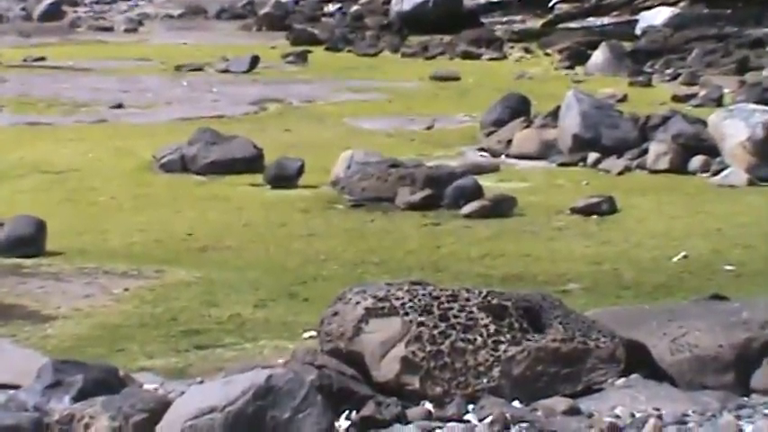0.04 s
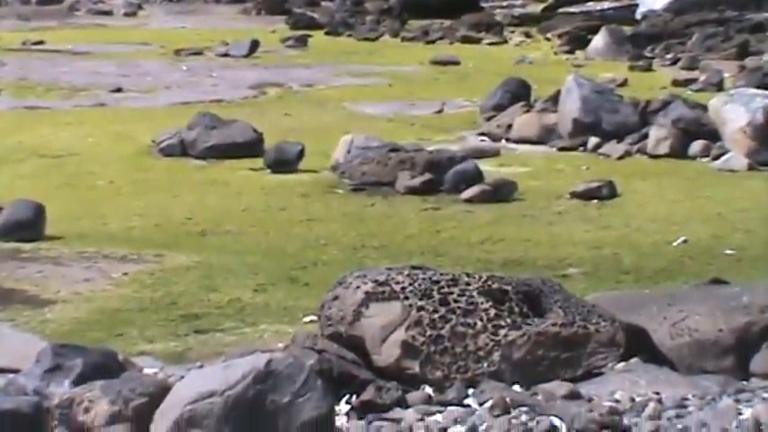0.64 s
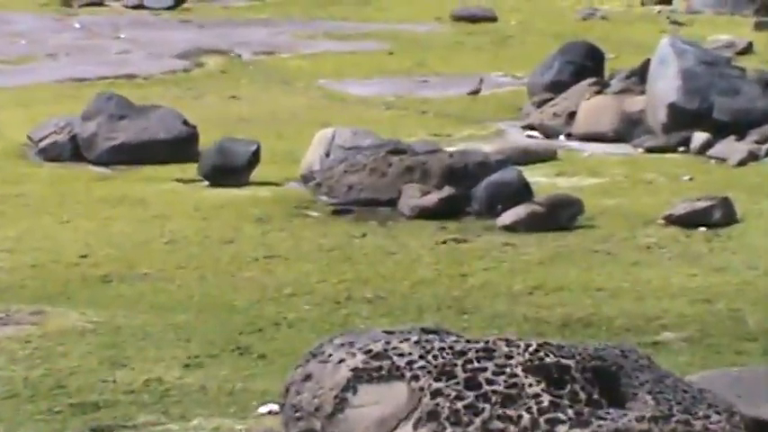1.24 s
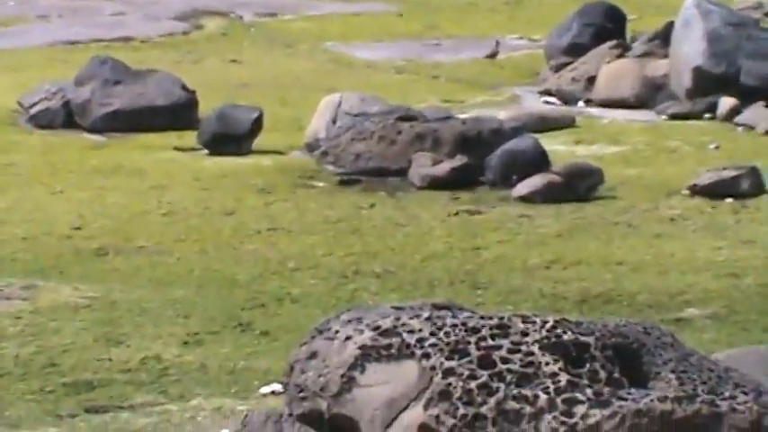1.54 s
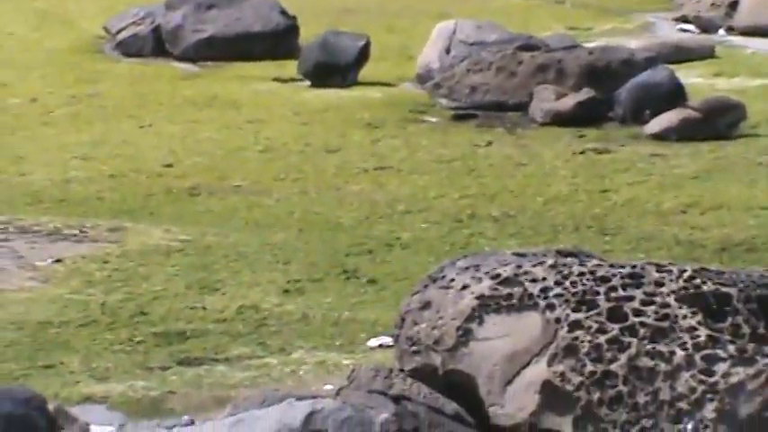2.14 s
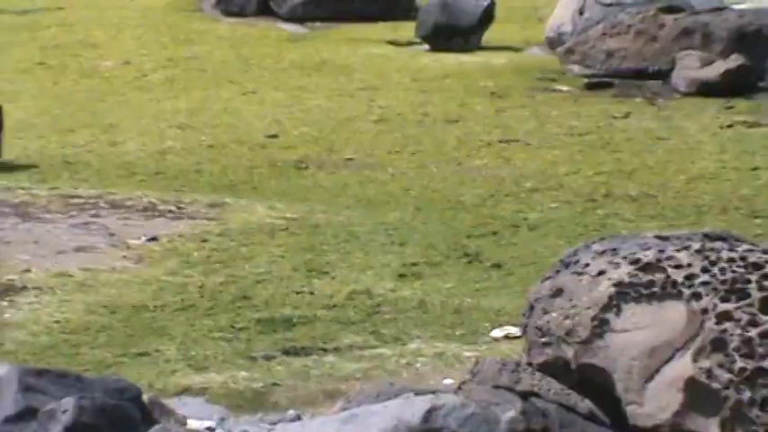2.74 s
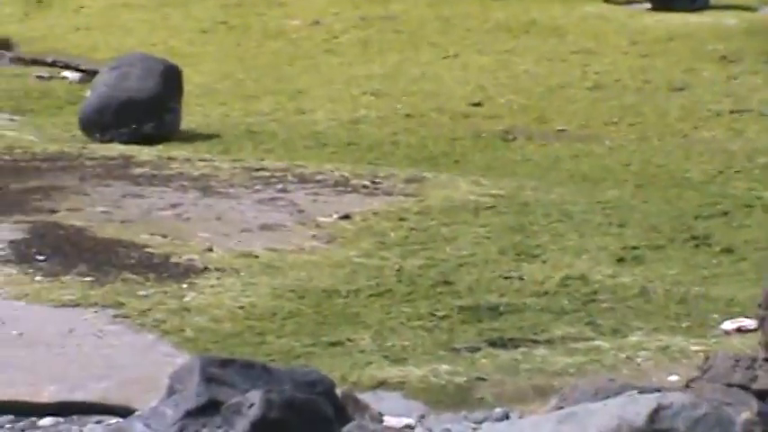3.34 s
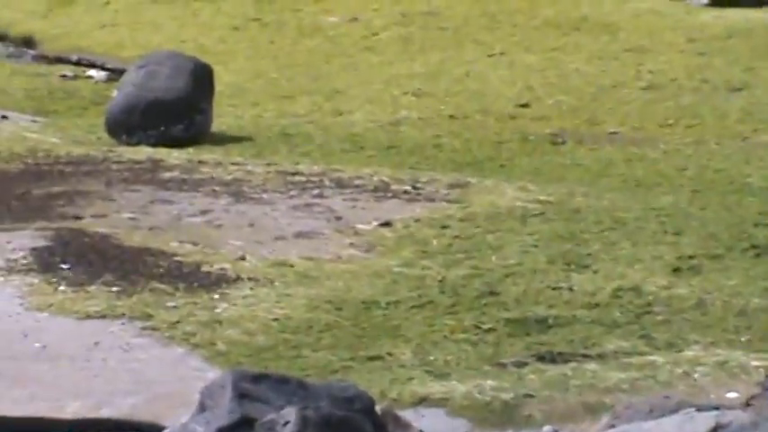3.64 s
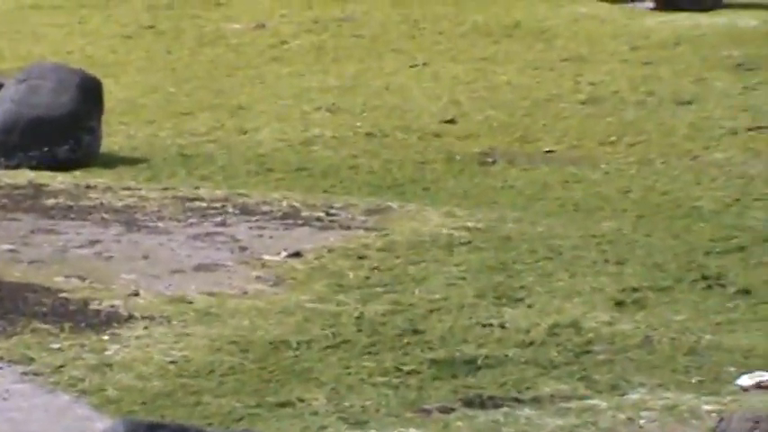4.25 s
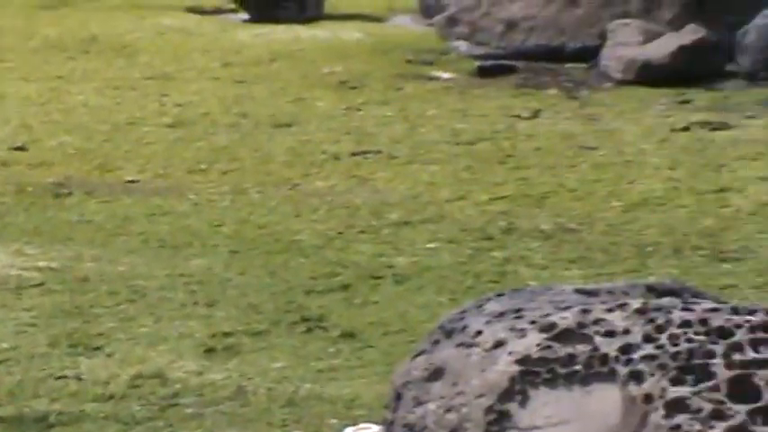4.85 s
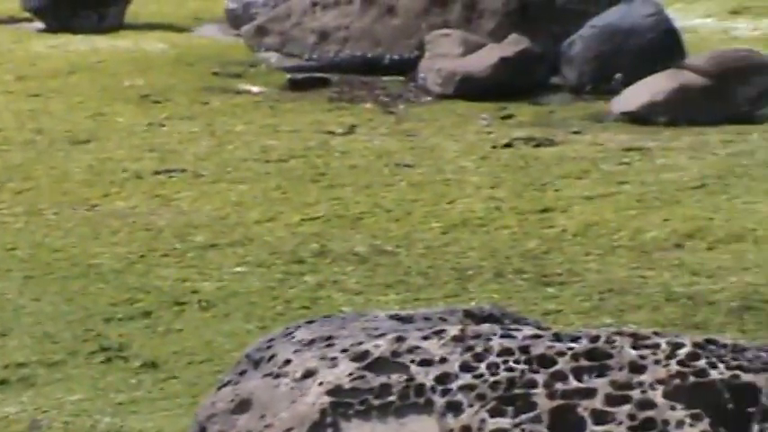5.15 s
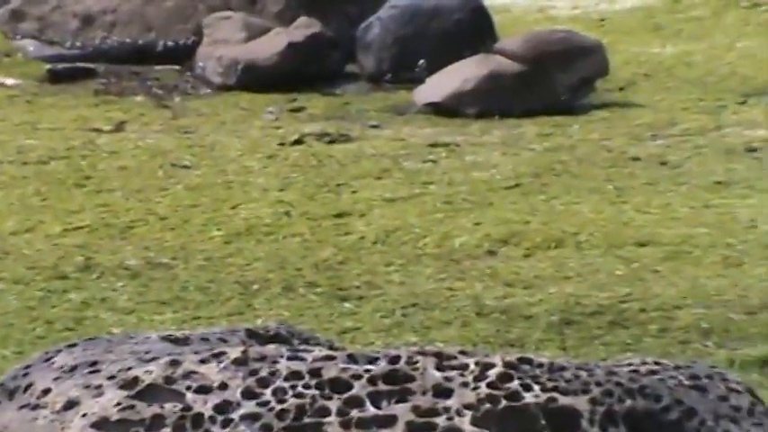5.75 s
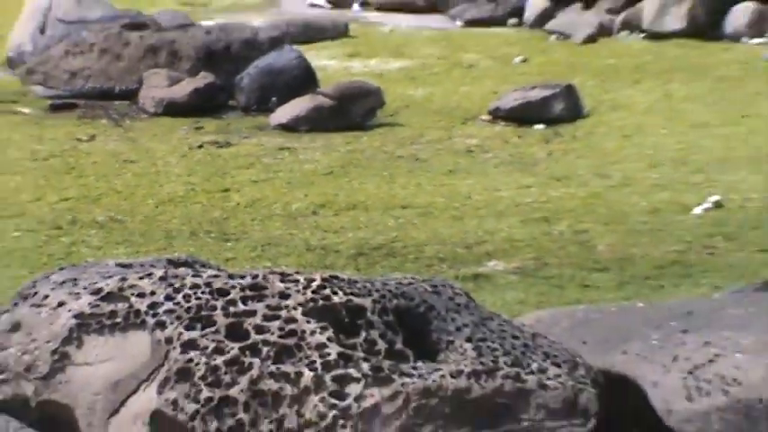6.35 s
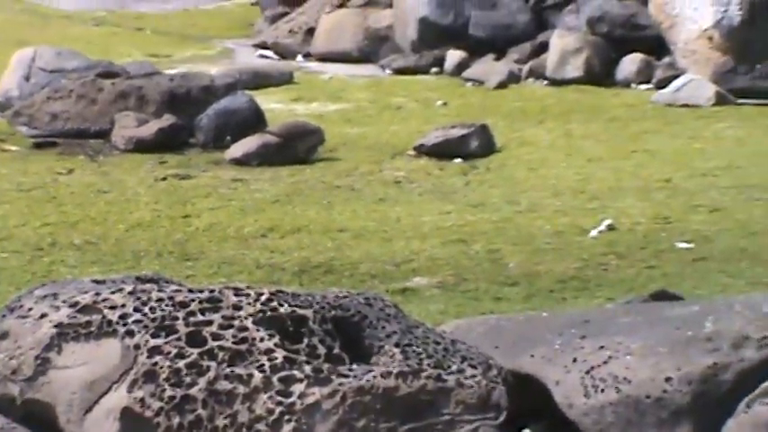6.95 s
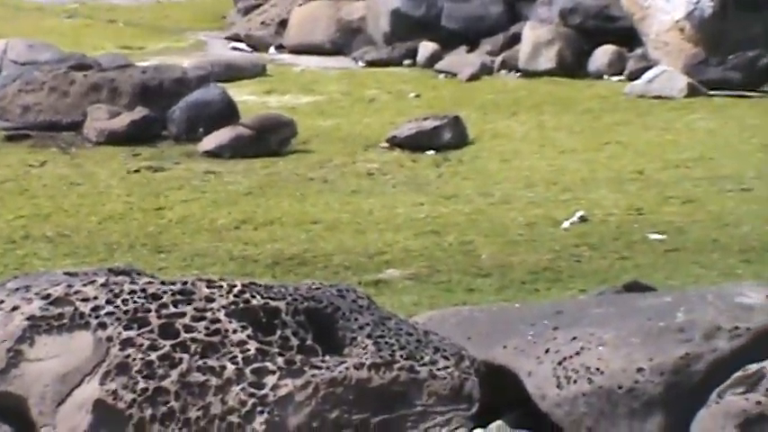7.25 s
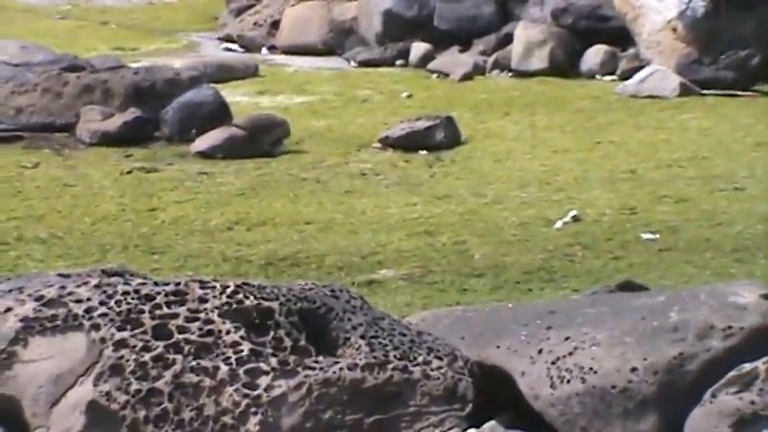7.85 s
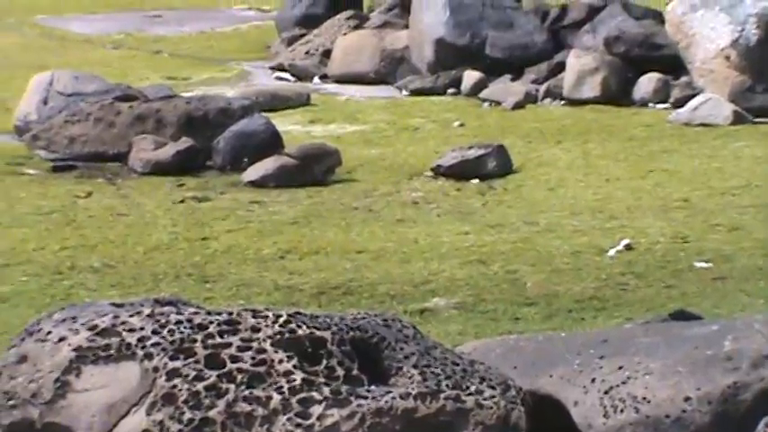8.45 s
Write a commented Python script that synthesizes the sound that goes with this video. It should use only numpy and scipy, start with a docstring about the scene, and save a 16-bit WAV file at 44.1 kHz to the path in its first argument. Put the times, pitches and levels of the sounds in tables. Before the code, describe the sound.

Gusty low wind buffets a hand-held camera's microphone on an open rocky shore while a shorebird gives high, piping calls that drop in pitch, one after another. A few close handling clicks sound early on. As the wind eases, the bird slows a little, and a soft bump and more clicks come from the camera body. Very faint distant birds and a slight motor hum lie underneath.

```python
"""A killdeer's clear, falling whistle repeats over wind rumbling on the microphone, out on a rocky
tidal flat. Near boulders throw each call back, and other birds call faintly from far off.
Eddies buffet the microphone ports, then the wind dies down to a soft hiss and a deep rumble.
Right at the microphone, the hand-held camera's motor hums and its shell clicks and bumps
under the fingers."""
import sys
import numpy as np
from scipy import signal
from scipy.fft import rfft, irfft, next_fast_len
from scipy.io import wavfile

SR = 44100
rng = np.random.default_rng(int(sys.argv[2]) if len(sys.argv) > 2 else 0)


def put_to_file(sound):
    """Save the sound as 16-bit audio at rate SR, in the file named by the first command-line argument."""
    columns = np.atleast_2d(sound).T  # one column per channel
    safe = np.clip(columns, -1, 1)
    whole_steps = np.round(safe * 32767)
    wavfile.write(sys.argv[1], SR, whole_steps.astype(np.int16))


N = 384111
TIME = np.arange(N) / SR

# Wind on the microphone: its low rumble and brighter flutter. Each row: frequency in Hz, relative dB.
RUMBLE_SPECTRUM = [(15, -7), (28, -8), (45, -0.5), (75, 1.5), (110, -3.5), (160, -11.5), (250, -28),
                   (500, -59.5), (1000, -78)]
FLUTTER_SPECTRUM = [(70, -16), (130, 7), (200, 2), (300, -7), (450, -17), (700, -27.5), (1200, -36.5),
                    (2500, -45.5), (6000, -47), (16000, -91)]
# Stereo width of the wind. Each row: frequency in Hz, side minus mid in dB.
WIND_STEREO = [(25, -30), (60, -5.5), (120, -0.5), (200, 0), (400, 6.5), (700, 5), (1500, 2)]


def killdeer(crest_s=0.01176, fall_s=0.019, hold_from_s=0.052, lift_s=0.019, rise_hz=32.8, lift_hz=71):
    """Each call arches over a loud crest, catches as it falls to a held note, and swells."""
    # Each row: start and length in seconds, crest and held pitch in Hz, crest and held level in dB,
    # swell in dB, boost of the other partials at the crest in dB.
    calls = [(0.131, 0.099, 4900, 4316, -28, -29, 2, 4), (0.65, .118, 4906, 4340, -26, -30, 2.5, 5),
             (1.106, .12, 4960, 4407, -25, -26, 2, 2.5), (1.652, 0.12, 4762, 4258, -21, -28, 1, 1.5),
             (2.15, .12, 4656, 4250, -22, -27.5, 0.5, -3), (2.603, .12, 4710, 4246, -23.5, -31.5, 3.5, .5),
             (3.187, 0.12, 4700, 4230, -22.5, -30.5, 5, 0), (3.767, .12, 4670, 4200, -23, -28.5, 0.5, 0),
             (4.342, .12, 4703, 4226, -24, -28.5, 2, 2), (4.91, 0.1188, 4700, 4227, -21.5, -29, 3.5, 1),
             (5.659, 0.12, 4730, 4218, -24.5, -29, 1.5, 1.5),
             (6.37, .13, 4720, 4256, -21.5, -27.5, 0.5, -1.5),
             (7.363, 0.12, 5200, 4643, -32.5, -34, 5.5, 11),
             (7.95, 0.12, 5000, 4383, -25.5, -32.5, 4.5, -32)]
    # The throat favours its second harmonic, heard as the whistle.
    # Each row: multiple of the whistle pitch, relative dB at the crest, relative dB while held.
    partials = [(.5, -26, -20.5), (1, 0, 0), (1.5, -36, -33), (2, -36, -41), (2.5, -36, -42), (3, -34, -44)]
    attack_s, release_s, push_s = 0.012, 0.015, 0.033
    catch_s, catch_width_s, catch_db = 0.038, 0.0079, 1.5
    out = np.zeros(N)
    for start, length, crest_hz, held_hz, crest_db, held_db, swell_db, boost_db in calls:
        t = np.arange(int((length + 0.0057) * SR)) / SR
        arch = np.exp(-((t - crest_s) / fall_s) ** 2)
        hold = np.interp(t, [hold_from_s, length - lift_s], [0, 1])
        lift = np.interp(t, [length - lift_s, length], [0, 1])
        hz = held_hz + (crest_hz - held_hz) * arch + rise_hz * hold + lift_hz * lift
        scoop = 1 - 0.056 * np.exp(-t / 0.0024)  # slides up into the note
        tremor = 1 + 0.0015 * drift(210, size=len(t))
        phase = 2 * np.pi * np.cumsum(hz * scoop * tremor) / SR
        push = 1 / (1 + (t / push_s) ** 8)
        catch = np.exp(-((t - catch_s) / catch_width_s) ** 2)
        effort_db = held_db + (crest_db - held_db) * push - catch_db * catch + swell_db * hold
        attack = np.sin(np.pi / 2 * np.clip(t / attack_s, 0, 1))
        release = np.clip((t[-1] - t) / release_s, 0, 1)
        voice = sum(from_db(held + (crest - held + boost_db * (k != 1)) * arch) * np.sin(k * phase)
                    for k, crest, held in partials)
        add(out, start, np.sqrt(2) * from_db(effort_db) * attack * release * voice)
    return out


def rocky_shore(call, t60_s=0.75, wash_db=-18, side_db=-7, build_s=0.078):
    """A few distinct echoes from near boulders, then a wash scattered by the rocks beyond."""
    # One echo per boulder. Each row: delay in seconds, level in dB.
    boulders = [(.012, -22), (.02, -20), (.031, -30.5), (0.079, -46.5), (0.093, -20), (.16, -27.5)]
    t = np.arange(SR) / SR
    envelope = from_db(-60 * t / t60_s) * np.clip(t / build_s, 0, 1)
    mid, side = rng.standard_normal((2, SR)) * envelope
    side *= from_db(side_db)
    response = from_db(wash_db) * np.array([mid + side, mid - side]) / np.linalg.norm(mid)
    for delay, db in boulders:
        response[:, int(delay * SR)] += from_db(db)
    return signal.fftconvolve(call[None], response, axes=1)[:, :N]


def wind(gust_db=1.5, gusts_per_s=7, lumpy_db=3, lumps_per_s=30, flutter_growth=1.526):
    """Eddies rumble on the microphone ports; a lumpy, brighter flutter grows faster as wind rises."""
    # Wind strength at the microphone. Each row: time in seconds, relative level in dB.
    strength = [(0.0, -28.5), (0.27, -28.5), (0.53, -24), (0.66, -27.5), (1.0, -24), (1.42, -37.5),
                (1.799, -38.5), (2.06, -33.5), (2.66, -36), (2.821, -32), (3.02, -29.0), (3.48, -36),
                (3.78, -27.5), (4.12, -35.5), (4.4, -29), (5.0, -39), (5.5, -45.5), (8.699, -46)]
    times, db = np.transpose(strength)
    wind_db = np.interp(TIME, times, db) + gust_db * drift(gusts_per_s)
    lean_left = from_db([[0.1], [-0.1]])
    rumble = from_db(wind_db - 2) * stereo_noise(RUMBLE_SPECTRUM, WIND_STEREO) * lean_left
    flutter_db = -45 + flutter_growth * (wind_db - db.mean()) + lumpy_db * drift(lumps_per_s)
    return rumble + from_db(flutter_db) * stereo_noise(FLUTTER_SPECTRUM, WIND_STEREO)


def buffets(spike_s=0.0008, suction_s=0.0034, swirl_s=0.021, far_port_db=-10):
    """An eddy bursts on one microphone port: a pressure spike in a shallow suction and a brief swirl."""
    # Each row: time in seconds, relative level in dB, port (0 left, 1 right).
    eddies = [(0.609, -13.5, 0), (.823, -11.5, 1), (0.851, -10, 0), (.97, -12, 1), (1.56, -20.5, 0),
              (2.788, -20, 1), (2.989, -18, 0), (3.24, -23.5, 1), (3.754, -16.5, 1), (4.009, -10, 1),
              (4.551, -25, 0), (4.799, -30, 1), (5.289, -27.5, 0)]
    out, t = np.zeros((2, N)), np.arange(-4096, 4096) / SR
    pulse = np.exp(-np.abs(t) / spike_s) - spike_s / suction_s * np.exp(-np.abs(t) / suction_s)
    for time, db, port in eddies:
        ports = np.roll([1, -from_db(far_port_db)], round(port))  # weak and inverted at the far port
        rumble = from_db(-14) * stereo_noise(RUMBLE_SPECTRUM, WIND_STEREO, size=len(t))
        flutter = from_db(-21) * stereo_noise(FLUTTER_SPECTRUM, WIND_STEREO, size=len(t))
        swirl = (rumble + flutter) * np.exp(-(t / swirl_s) ** 2)
        add(out, time + t[0], from_db(db) * (np.outer(ports, pulse) + swirl))
    return out


def finger_clicks(grit_db=-17, contact_s=0.0037, rattle_db=-19, rattle_s=0.031, crack_s=0.002):
    """A sharp, gritty push cracks and rings the camera shell, which rattles on for a moment."""
    # Each row: start in seconds, relative level in dB, hardness (extra level of the crack) in dB.
    clicks = [(0.169, -31, 0), (0.256, -34.5, -10), (0.278, -26.5, 6), (0.569, -31, -18), (0.654, -44, -4),
              (0.682, -27, -12), (0.752, -36, -7), (0.91, -39, -13), (1.033, -42, -27), (1.044, -37, -32),
              (2.685, -29.5, -9), (5.765, -25.5, -1.5), (5.772, -30, -2), (5.821, -31, -7),
              (6.413, -39.5, -9), (6.523, -32, -15), (6.603, -34.5, -19), (6.627, -35, -30),
              (6.76, -34, -16), (6.787, -33, -14), (7.056, -43, -25), (7.113, -34.5, -10.5),
              (8.104, -27, -3.5), (8.348, -31, -23)]
    # Colour of the contact crack. Each row: frequency in Hz, relative level in dB.
    crack_spectrum = [(1200, -30), (2500, 7.5), (3800, -2), (5200, 13.5), (6800, -3), (8300, 2),
                      (11500, -9.5), (16000, -21)]
    # Its stereo width. Each row: frequency in Hz, side minus mid in dB.
    crack_stereo = [(2000, -24), (9000, -14)]
    out, t = np.zeros((2, N)), np.arange(4096) / SR
    strike = slice(0, 220)  # the first 5 ms set the level
    grit_decay = np.exp(-t / contact_s) + from_db(rattle_db) * np.exp(-t / rattle_s)
    for start, db, hardness_db in clicks:
        grit = rng.standard_normal((2, len(t))) * grit_decay
        body = shell((t == 0) + from_db(grit_db) * grit)  # only the push reaches both ports alike
        crack = stereo_noise(crack_spectrum, crack_stereo, size=len(t)) * np.exp(-t / crack_s)
        add(out, start, from_db(db - 2) * body / np.std(body[:, strike]))
        add(out, start, from_db(db + hardness_db - 3) * crack / np.std(crack[:, strike]))
    return out


def grip(thump_hz=245, thump_s=0.0051, push_s=0.0004, grain_db=6, grains_per_s=130):
    """The soft hand thumps the whole camera in its lowest mode, and sliding fingers rub the shell."""
    # Bumps of the hand. Each row: start in seconds, relative level in dB.
    bumps = [(5.821, -21), (5.843, -22.5)]
    # Finger slides. Each row: start and length in seconds, level in dB.
    scuffs = [(0.577, 0.17, -45.5), (1.02, 0.062, -46.5), (5.772, 0.12, -44)]
    out, t = np.zeros((2, N)), np.arange(4096) / SR
    thump = np.sin(2 * np.pi * thump_hz * t) * np.exp(-t / thump_s) * (1 - np.exp(-t / push_s))
    for start, db in bumps:
        add(out, start, from_db(db) * thump)
    for start, length, db in scuffs:
        size = int(length * SR)
        friction = rng.standard_normal((2, size)) * from_db(grain_db * drift(grains_per_s, size=size))
        add(out, start, from_db(db) * rms_one(shell(friction * np.hanning(size))))
    return out


def shell(force):
    """The camera shell rings in its resonances."""
    # Each row: frequency and width in Hz, gain in dB.
    modes = [(274, 35, 1), (461, 53, -3.5), (719, 130, 1.5), (866, 76, 2.5), (1014, 50, 6),
             (1364, 134, 0.5), (1507, 204, -0.5), (1954, 116, -5.5), (2590, 760, -9.5), (2696, 67, -5),
             (3070, 1350, -39)]
    return sum((-1) ** k * from_db(db) * resonate(force, hz, width_hz)
               for k, (hz, width_hz, db) in enumerate(modes))


def far_birds(gain_db=2):
    """Three kinds of call from far across the flat: rising chips, falling slurs and thin whistles."""
    # One bird's short chips. Each row: start in seconds, middle pitch in Hz, relative level in dB.
    chips = [(3.63, 5370, -60), (4.05, 5950, -57), (4.65, 6150, -57.5), (5.05, 6290, -56.5),
             (5.33, 6280, -56), (5.52, 6520, -56), (6.01, 6850, -60), (6.23, 6780, -57), (6.52, 6420, -64),
             (7.47, 6300, -63)]
    # Another's long slurs. Each row: start and length in seconds, middle pitch in Hz, relative dB.
    slurs = [(0.262, 0.32, 3330, -54), (1.785, 0.4, 3870, -56.5), (3.518, 0.44, 3710, -58),
             (5.722, .52, 3250, -57.5), (6.52, 0.63, 3630, -55), (6.849, .66, 3130, -60),
             (7.897, 0.49, 3290, -62.5), (8.524, 0.23, 4150, -56)]
    # Each row: start and length in seconds, middle pitch in Hz, glide in octaves, relative dB.
    whistles = [(-.06, .31, 5120, 0.12, -57.5), (1.577, 0.16, 3700, .02, -61.5),
                (8.613, 0.14, 3820, -0.061, -57)]
    out = np.zeros((2, N))
    for start, hz, db in chips:
        add(out, start, from_db(db) * far_call(0.16, hz, octaves=0.18, blur_hz=800))
    for start, length, hz, db in slurs:
        add(out, start, from_db(db) * far_call(length, hz, octaves=-0.21, blur_hz=780))
    for start, length, hz, octaves, db in whistles:
        add(out, start, from_db(db) * far_call(length, hz, octaves, blur_hz=30))
    return from_db(gain_db) * out


def far_call(length_s, middle_hz, octaves, blur_hz, side_db=-7):
    """Distance smears a gliding note into a soft, wide swell."""
    along = np.linspace(0, 1, int(length_s * SR))
    hz = middle_hz * 2 ** (octaves * (along - 0.5))
    mid = blurred_tone(hz, blur_hz)
    side = from_db(side_db) * blurred_tone(hz, blur_hz)
    return np.sin(np.pi * along) ** 0.97 * np.array([mid + side, mid - side])


def camera_motor(fade_s=0.23, waver_hz=2, spin_up_s=0.3):
    """The small drive by the microphone whirs in narrow bands, with thin whines that come and go."""
    # Each row: centre and nominal width in Hz, level in dB.
    whir_bands = [(1123, 63, -65), (1050, 160, -67), (1556, 200, -73.5)]
    # Each row: pitch in Hz, level in dB, start and stop in seconds, share by which it starts flat.
    whines = [(844, -67, 2.2, 6.9, 0.0017), (840, -71, 6.74, 12, 0), (980, -70, 2.5, 2.9, .08),
              (953, -72, 3.7, 5, 0.041), (6380, -80.5, 0.514, 12, 0.0021)]
    out = np.zeros((2, N))
    for hz, width_hz, db in whir_bands:
        band = resonate(rng.standard_normal((2, N)), hz, 1.34 * width_hz)
        band = resonate(band, hz, 1.34 * width_hz)  # a second pass steepens the skirts
        out += from_db(db) * rms_one(band)
    for hz, db, start, stop, flat in whines:
        running = np.clip(np.minimum(TIME - start, stop - TIME) / fade_s, 0, 1)
        speed = 1 - flat * np.exp(-np.maximum(TIME - start, 0) / spin_up_s)
        pitch = hz * speed + waver_hz * drift(5.5)
        out += np.sqrt(2) * from_db(db) * running * np.sin(2 * np.pi * np.cumsum(pitch) / SR)
    return out


def open_air(hiss_db=-58, deep_db=-50.5):
    """A soft hiss and a steady deep rumble stay on the flat when the wind drops."""
    # Their colours. Each row: frequency in Hz, relative level in dB.
    hiss_spectrum = [(150, -34), (250, 0), (380, -4), (674, -4.5), (775, -5), (831, -1), (906, -5),
                     (1100, -0.5), (1330, -8.5), (1910, -12.5), (2530, -8.5), (2670, -11), (5440, -15),
                     (14900, -16.5), (16000, -17.5)]
    deep_spectrum = [(15, -5.5), (30, 0), (55, 2.5), (90, -7), (150, -21), (300, -46.5)]
    # Stereo width of the hiss. Each row: frequency in Hz, side minus mid in dB.
    hiss_stereo = [(300, -3), (700, 0.5), (1200, -1.5), (2400, 5.5), (4400, -4), (8000, -4), (15000, -18.5)]
    hiss = from_db(hiss_db) * stereo_noise(hiss_spectrum, hiss_stereo)
    return hiss + from_db(deep_db) * stereo_noise(deep_spectrum, WIND_STEREO)


def from_db(db):
    return 10 ** (np.asarray(db) / 20)


def rms_one(x):
    return x / np.sqrt(np.mean(x ** 2) + 1e-20)


def at_hz(points, hz):
    """Read a spectrum along a log-frequency axis."""
    point_hz, value = np.transpose(points)
    return np.interp(np.log(np.maximum(hz, 1)), np.log(point_hz), value)


def add(track, start_s, sound):
    """Mix a sound into a track at a time."""
    start = round(start_s * SR)
    first, last = max(start, 0), min(start + sound.shape[-1], N)
    track[..., first:last] += sound[..., first - start:last - start]


def resonate(x, hz, width_hz):
    """Two-pole resonance with gain 1 at its peak."""
    radius = np.exp(-np.pi * width_hz / SR)
    feedback = [1, -2 * radius * np.cos(2 * np.pi * hz / SR), radius ** 2]
    return signal.lfilter(np.array([1, 0, -1]) * (1 - radius ** 2) / 2, feedback, x)


def drift(rate_hz, size=N, order=6):
    """Smooth random wandering with spread about 1."""
    length = next_fast_len(size + 8192)
    hz = np.arange(length // 2 + 1) * SR / length
    spectrum = rfft(rng.standard_normal(length)) / np.sqrt(1 + (hz / rate_hz) ** order)
    return rms_one(irfft(spectrum, length))[:size]


def stereo_noise(spectrum, width, size=N):
    """Noise of a given colour and stereo width; the middle has rms 1."""
    length = next_fast_len(size)
    hz = np.arange(length // 2 + 1) * SR / length
    mid, side = rfft(rng.standard_normal((2, length))) * from_db(at_hz(spectrum, hz))
    mid = irfft(mid, length)
    side = irfft(side * from_db(at_hz(width, hz)), length)
    return np.array([mid + side, mid - side])[:, :size] / np.std(mid)


def blurred_tone(hz, blur_hz):
    """Scrambled phase and strength spread a tone into a band with soft skirts."""
    phase = 2 * np.pi * np.cumsum(hz) / SR
    parts = (drift(blur_hz / 2, size=len(hz), order=3) * wave(phase) for wave in (np.cos, np.sin))
    return sum(parts) / np.sqrt(2)


def scene():
    """The killdeer sits just right of centre, with the flat behind it and wind and hands up close."""
    bird = killdeer()
    shore = (bird + rocky_shore(bird)) * from_db([[-0.45], [0.45]])
    background = open_air() + far_birds()
    return shore + background + wind() + buffets() + camera_motor() + finger_clicks() + grip()


def record(dry):
    """The treble is cut steeply at the very top."""
    cutoff_hz = 15950
    return signal.sosfilt(signal.ellip(10, 0.1, 80, cutoff_hz, fs=SR, output="sos"), dry)


dry = scene()
out = record(dry)
put_to_file(out)
```